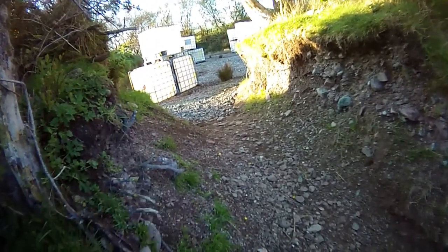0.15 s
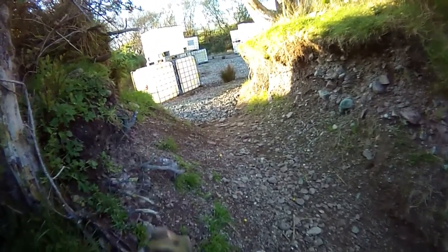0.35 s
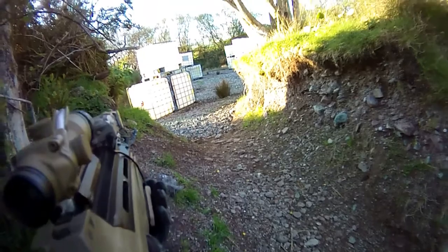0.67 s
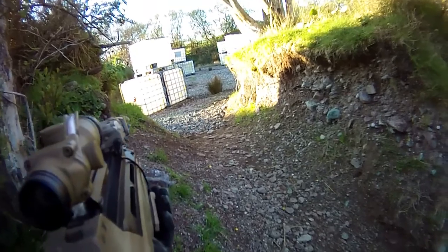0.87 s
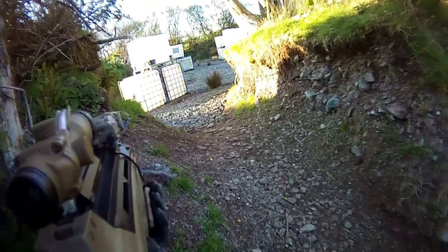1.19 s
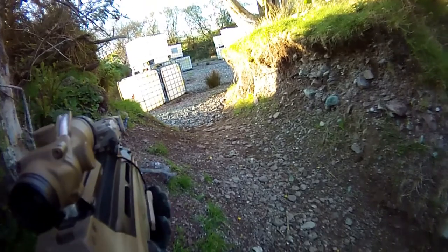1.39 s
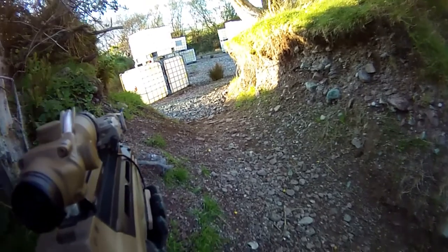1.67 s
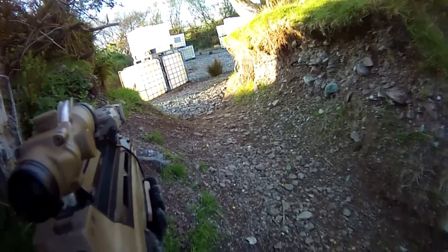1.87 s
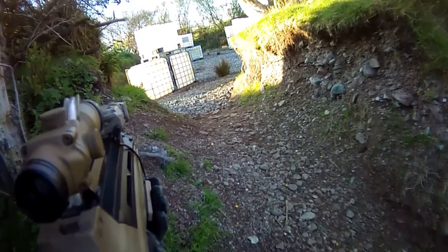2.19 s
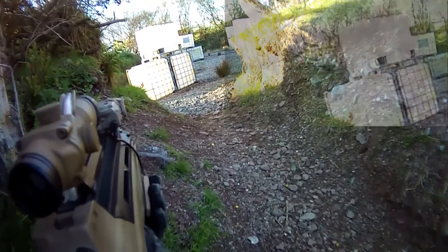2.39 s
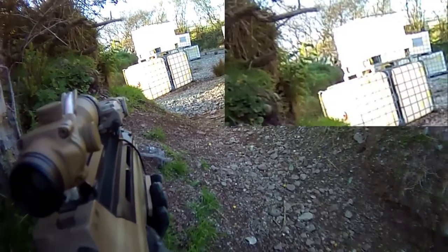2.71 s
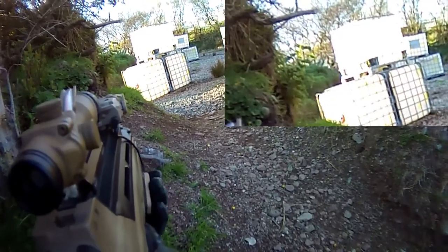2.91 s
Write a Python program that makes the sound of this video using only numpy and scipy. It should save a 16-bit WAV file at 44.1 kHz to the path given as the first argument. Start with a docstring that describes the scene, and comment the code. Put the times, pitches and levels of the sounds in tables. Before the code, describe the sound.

After about two and a half quiet seconds of wind, leaf hiss and a far rattling gun, a close airsoft rifle whirs and cracks twice, with a third shot cut off, between earth banks outdoors.

```python
"""An electric airsoft rifle, close to the microphone, fires two single shots and starts a third.
In each cycle a motor winds the gears as tooth pulses, grind and a gliding sine; a slammed piston gives damped
low sines, the muzzle noise cracks and hissing air, and trigger and latch clack as ringing noise bursts.
Before that the rifle is raised with ticks and rustles of shaped noise. A distant gun rattles as pulsed noise,
over wind and leaf noise, a low hum and a faint whine. Earth banks return a short tail; peaks overload softly."""
import sys
import numpy as np
from scipy import signal
from scipy.fft import rfft, irfft, next_fast_len
from scipy.io import wavfile
from scipy.ndimage import map_coordinates

SR = 44100
rng = np.random.default_rng(int(sys.argv[2]) if len(sys.argv) > 2 else 0)


def master(y):
    """Save y as 16-bit WAV."""
    cut = np.clip(np.atleast_2d(y).T, -1, 1)
    pcm = np.round(cut * 32767)  # scale
    wavfile.write(sys.argv[1], SR, pcm.astype(np.int16))


N = 134505

# firing cycles: motor start t/s, piston slam t/s, coasting time t/s, gear drive level/dB
CYCLES = [(2.625, 2.6695, 0.082, -11.5), (2.832, 2.888, .105, -12), (3.026, 3.078, .09, -12)]
CONTACT_RISE_S = 0.00022  # time constant of hard plastic contacts


def amp(db):
    """Level definition: decibels to amplitude ratio."""
    return 10 ** (np.asarray(db) / 20)


def unit(x):
    """Power normalisation: scale to rms 1."""
    return x / np.sqrt(np.mean(x ** 2) + 1e-20)


def clock():
    """Uniform sampling: the time of each sample in seconds."""
    return np.arange(N) / SR


def along(points, hz):
    """Interpolation of (f/Hz, level/dB) points along logarithmic frequency."""
    f, level = np.transpose(points)
    return np.interp(np.log(hz + 1), np.log(f + 1), level)


def bump(hz, centre, width):
    """Lorentzian resonance curve: 1 at its centre, one half at half the width to either side."""
    return 1 / (1 + (2 * (hz - centre) / width) ** 2)


def wobble(rate):
    """Slow random modulation: a spline through normal random knots, rate of them a second."""
    knots = rng.standard_normal(int(N * rate / SR) + 4)
    return map_coordinates(knots, [clock() * rate])


def coloured(x, curve):
    """Minimum-phase filtering: a causal filter of unit power gain, shaped by dB against frequency."""
    m = 2 * next_fast_len(N // 2 + SR // 8)
    gain = unit(amp(curve(np.fft.rfftfreq(m, 1 / SR))))
    # folding the cepstrum onto positive times makes the response causal
    cepstrum = irfft(np.log(gain + 1e-9), m)
    cepstrum[1:m // 2] *= 2
    cepstrum[m // 2 + 1:] = 0
    response = np.exp(rfft(cepstrum))
    return irfft(rfft(x, m) * response, m)[:N]


def puff(envelope, tone):
    """Source-filter principle: white noise under an envelope, then coloured."""
    return coloured(envelope * rng.standard_normal(N), lambda hz: along(tone, hz))


def decay(age, t60):
    """Exponential damping: a fall of 60 dB in t60 seconds."""
    return np.exp(-np.log(1000) * age / t60)


def strike(s, rise, t60):
    """Impact excitation: a quick rise at s and an exponential fall."""
    age = np.maximum(clock() - s, 0)
    return (1 - np.exp(-age / rise)) * decay(age, t60)


def body(hz, ring=1):
    """Modal response: resonances of the rifle's shell, in dB, stand on its broad colour."""
    # broad colour: f/Hz, relative level/dB
    shell_tone = [(30, -22), (150, -8), (350, -4), (600, -1.5), (900, -6.5), (1400, -10), (2500, -7.5),
                  (3500, -3.5), (5000, -13.5), (6200, -23), (7500, -26.5), (10000, -37), (15000, -60)]
    # shell resonances: f/Hz, width f/Hz, lift level/dB
    modes = [(566, 150, 8.5), (690, 46, 7.9), (927, 130, 3.4), (1170, 230, 3.8), (2030, 99, 10.9),
             (2400, 50, 1.9), (3030, 220, 4.5), (3470, 110, 3), (4070, 33, 2), (4580, 120, 11),
             (4890, 110, 8.5), (6070, 105, 14.5)]
    return along(shell_tone, hz) + ring * sum(lift * bump(hz, f, width) for f, width, lift in modes)


def wind():
    """Turbulent pressure: a low-pitched noise rumble of gently varying level."""
    # wind spectrum: f/Hz, relative level/dB per Hz
    rumble_tone = [(12, -27), (20, 2), (80, -3.5), (102, -6), (140, -3.5), (171, -9), (199, -7),
                   (224, -15.5), (329, -15.5), (437, -18), (612, -16), (665, -18), (1100, -46.5),
                   (1430, -60), (2420, -120)]
    level_db = -42 + 0.5 * wobble(9.45)
    return puff(amp(level_db), rumble_tone)


def leaves():
    """Random superposition: the many small contacts of leaves merge into a fluctuating hiss."""
    # leaf spectrum: f/Hz, relative level/dB per Hz
    hiss_tone = [(400, -11.5), (900, -3), (1500, 2.5), (3500, -2), (5000, -7.5), (6500, -15), (8500, -20),
                 (12000, -21), (15000, -21)]
    level_db = -55 + 1.35 * wobble(22.13)
    return puff(amp(level_db), hiss_tone)


def hum():
    """Amplitude and phase modulation: a low sine wavers at random."""
    hum_hz, hum_db = 77, -51
    swell = amp(0.81 * wobble(4.55))
    phase = 2 * np.pi * hum_hz * clock() + 1.4 * wobble(4.83)
    return amp(hum_db) * unit(swell * np.sin(phase))


def whine():
    """Phase modulation: a faint thin tone and its lower octave share one wavering phase."""
    whine_hz, waver_rad = 10220, 0.6
    upper_db, lower_db = -77.5, -77
    phase = 2 * np.pi * whine_hz * clock() + waver_rad * wobble(180)
    return amp(upper_db) * np.sin(phase) + amp(lower_db) * np.sin(phase / 2)


def far_gun():
    """Periodic excitation with scattering: even distant shots, smeared by the trees into overlapping decays."""
    # distant fire over time: t/s, level/dB
    far_level = [(0, -56), (1.05, -61.5), (1.16, -56), (1.45, -55.5), (1.8, -54), (2.0, -51), (2.22, -50),
                 (2.33, -46), (2.57, -45), (3.05, -39)]
    # colour of the distant fire: f/Hz, relative level/dB
    far_tone = [(200, -7), (650, 0.5), (1100, -15.5), (1700, -3), (2100, 2.5), (2700, -4.5), (3500, -1.5),
                (4500, -6.5), (6000, -17.5), (8000, -27.5), (15000, -35.5)]
    anchor_s, period_s = 2.56, 0.0403  # one shot falls on the anchor
    rise_s, t60_s, scatter_db = 0.004, 0.15, 0.96
    t = clock()
    age = (t - anchor_s) % period_s
    # the latest shot and the one before it sound together
    beat = sum((1 - np.exp(-a / rise_s)) * decay(a, t60_s) for a in (age, age + period_s))
    level_db = np.interp(t, *np.transpose(far_level)) + scatter_db * wobble(23.6)
    return puff(unit(beat) * amp(level_db), far_tone)


def kit_ticks():
    """Impact excitation: sling and kit tick briefly as the rifle comes up."""
    # ticks: t/s, level/dB
    tick_times = [(.157, -41), (0.169, -40.5), (0.1876, -42.5), (.497, -41), (0.5462, -35), (0.575, -44),
                  (0.6, -42), (0.689, -42), (0.884, -43.5)]
    # tick colour: f/Hz, relative level/dB
    tick_tone = [(300, -35), (1500, 0.5), (3300, 4.5), (5500, -0.5), (8000, -15.5), (15000, -40)]
    rise_s, t60_s = 0.0008, 0.024
    envelope = sum(amp(db) * strike(s, rise_s, t60_s) for s, db in tick_times)
    return puff(envelope, tick_tone)


def clothing():
    """Friction noise: brushes of cloth swell and fade with an irregular grain as the shooter takes aim."""
    # brushes: centre t/s, half length (standard deviation) t/s, level/dB
    strokes = [(0.268, 0.022, -46), (0.77, 0.023, -44.5), (1.121, 0.0077, -56), (1.979, 0.015, -47)]
    # cloth colour: f/Hz, relative level/dB
    cloth_tone = [(60, -8.5), (300, 0.5), (700, -3), (1500, -17), (4000, -12.5), (8000, -34.5),
                  (15000, -57)]
    t = clock()
    envelope = sum(amp(db) * np.exp(-0.5 * ((t - s) / half) ** 2) for s, half, db in strokes)
    grain = amp(3.1 * wobble(220))
    return puff(envelope * grain, cloth_tone)


def trigger():
    """Damped impact: the trigger springs back between the two shots with a thin click."""
    # click colour: f/Hz, relative level/dB
    click_tone = [(500, -28), (2000, -14), (4000, -4), (6500, 4), (9000, -3), (10500, -28), (15000, -26)]
    reset_s, reset_db, t60_s = 2.8212, -22, 0.016
    return puff(amp(reset_db) * strike(reset_s, CONTACT_RISE_S, t60_s), click_tone)


def clacks():
    """Modal excitation: each contact of trigger, latch or gear is a tick and a chatter that ring the shell."""
    # contacts: t/s, level/dB, t60 t/s, brightness level/dB per octave
    contacts = [(2.582, -32.5, 0.066, -0.5), (2.5939, -22, .025, 2), (2.6277, -25, .03, -0.5),
                (2.6371, -23.5, 0.085, -6.5), (2.6436, -14.5, 0.031, 1), (2.6968, -10, 0.014, 5.5),
                (2.709, -21.5, 0.024, 7), (2.7551, -7.5, 0.018, -0.5), (2.758, -8, .012, -4),
                (2.7811, -13.5, .025, -2), (2.792, -24.5, 0.071, -1), (2.8352, -21.5, 0.027, 3),
                (2.8457, -13.5, 0.043, -3), (2.8761, -9, 0.0096, 5.5), (2.909, -8.5, 0.029, 3),
                (2.9446, -10, 0.021, 2.5), (2.9587, -16.5, 0.027, -1), (2.993, -23.5, .025, 1),
                (3.0304, -17, .02, 0.5)]
    tick, ring_share = 4.5, 0.62  # impulse height; share of the shell's resonances reached
    out = np.zeros(N)
    for s, db, t60, tilt in contacts:
        push = strike(s, CONTACT_RISE_S, t60) * rng.standard_normal(N)
        push[round(s * SR)] += tick

        def contact_tone(hz):
            """Spectral tilt: the shell's response made brighter or duller from 400 to 9000 Hz."""
            return body(hz, ring_share) + tilt * np.log2(np.clip(hz, 400, 9000))

        out += amp(db) * coloured(push, contact_tone)
    return out


def gears():
    """Tooth-mesh excitation: pitch follows the motor's speed; teeth and loose parts rattle the shell."""
    spin_up_s, engage_s, coast_power = 0.022, 0.015, 1.19
    mesh_hz, jitter = 2329, 0.089  # mesh rate at full speed; scatter in tooth spacings
    slam_keeps = 0.85  # share of its speed that the motor keeps after the slam
    mesh_db, grind_db, rattle_db = -4, -5, 3
    t, drive = clock(), np.zeros(N)
    for start, slam, coast, db in CYCLES:
        age = np.maximum(t - start, 0)
        coasting = np.clip(1 - (t - slam) / coast, 0, 1)
        speed = (1 - np.exp(-age / spin_up_s)) * coasting * np.where(t > slam, slam_keeps, 1)
        teeth_passed = np.cumsum(speed) * mesh_hz / SR

        # each tooth is an impulse of scattered time and strength
        chance = rng.standard_normal((512, 2))
        tooth = np.arange(1, 513) + jitter * chance[:, 0]
        heard = tooth < teeth_passed[-1]
        places = np.searchsorted(teeth_passed, tooth[heard])
        strengths = amp(2.84 * chance[heard, 1])
        teeth = np.bincount(places, strengths, N) * np.sqrt(SR / mesh_hz)

        grind = amp(grind_db) * rng.standard_normal(N)
        mesh = amp(mesh_db) * np.sin(2 * np.pi * teeth_passed)
        rattle = amp(rattle_db * wobble(170))
        effort = (1 - np.exp(-(age / engage_s) ** 2)) * coasting ** coast_power
        drive += amp(db) * effort * (0.5 * teeth + rattle * grind + 0.2 * mesh)
    return coloured(drive, body)


def piston():
    """Damped oscillation: release, slam and rebound each knock the stock at a low pitch."""
    # knocks of one stroke: delay after the slam t/s, f/Hz, level/dB, t60 t/s
    stroke_knocks = [(-.0071, 404, -0.5, 0.024), (-.0026, 155.7, 4, 0.02), (.0037, 296, -2, .04)]
    rise_s = 0.00078
    t, out = clock(), np.zeros(N)
    for _, slam, _, _ in CYCLES:
        for delay, hz, db, t60 in stroke_knocks:
            s = slam + delay
            out += amp(db) * strike(s, rise_s, t60) * np.sin(2 * np.pi * hz * (t - s))
    return out


def air():
    """Jet noise: the air leaving the muzzle hisses and fades."""
    # air colour: f/Hz, relative level/dB
    air_tone = [(500, -30), (3000, -7), (6500, 7.5), (9000, -5), (15000, -13)]
    air_db, rise_s, t60_s = -17.5, 0.003, 0.098
    envelope = sum(amp(air_db) * strike(slam, rise_s, t60_s) for _, slam, _, _ in CYCLES)
    return puff(envelope, air_tone)


def cracks():
    """Impulsive resonance: piston head, muzzle and rebound crack, each coloured at its own ringing pitch."""
    # cracks of one stroke: delay after the slam t/s, held length t/s, level/dB, ringing pitch f/Hz
    stroke_cracks = [(0, 0.0026, -9, 5980), (.0028, 0.0015, 0, 4280), (.0072, .0008, -13, 4800)]
    # common crack colour: f/Hz, relative level/dB
    crack_tone = [(200, 1), (1500, -10), (3000, 2), (4200, 7.5), (6000, 1), (7500, -3.5), (11000, -10.5),
                  (16000, -18)]
    fall_s, width_hz, ring_db = 0.004, 1300, 12  # fall is the t60 after the held length
    t, out = clock(), np.zeros(N)
    for delay, length, db, pitch in stroke_cracks:
        burst = np.zeros(N)
        for _, slam, _, _ in CYCLES:
            age = t - slam - delay
            burst += (age > 0) * decay(np.maximum(age - length, 0), fall_s)

        def ringing_tone(hz):
            """Resonance: one peak raised on the common crack colour."""
            return along(crack_tone, hz) + ring_db * bump(hz, pitch, width_hz)

        out += amp(db) * coloured(burst * rng.standard_normal(N), ringing_tone)
    return out


def bank(x):
    """Diffuse reflection: the earth banks scatter back a short, decaying noise tail of unit energy."""
    delay_s, t60_s = 0.008, 0.36
    t = np.arange(SR // 2) / SR
    tail = rng.standard_normal(len(t)) * (t > delay_s) * decay(t, t60_s)
    return signal.fftconvolve(x, tail / np.linalg.norm(tail))[:N]


def scene():
    """Superposition: the rifle and its echo over the quiet field."""
    echo_db, thump_echo_db = -24.5, 3  # the second is extra echo for the low knocks
    field = wind() + leaves() + hum() + whine() + far_gun()
    handling = kit_ticks() + clothing()
    bright = trigger() + clacks() + gears() + air() + cracks()
    thump = piston()
    echo = amp(echo_db) * bank(bright + amp(thump_echo_db) * thump)
    return (field + handling + bright + thump + echo)[None]


def record(dry):
    """Amplitude saturation and band limitation: the microphone rounds off peaks, then the top is cut."""
    overload, top_hz = 0.92, 15750
    clipped = dry / (1 + np.abs(dry / overload) ** 8) ** (1 / 8)
    m = next_fast_len(N + SR // 2)
    passed = np.fft.rfftfreq(m, 1 / SR) < top_hz
    return irfft(rfft(clipped, m) * passed, m)[..., :N]


dry = scene()
out = record(dry)
master(out)
```